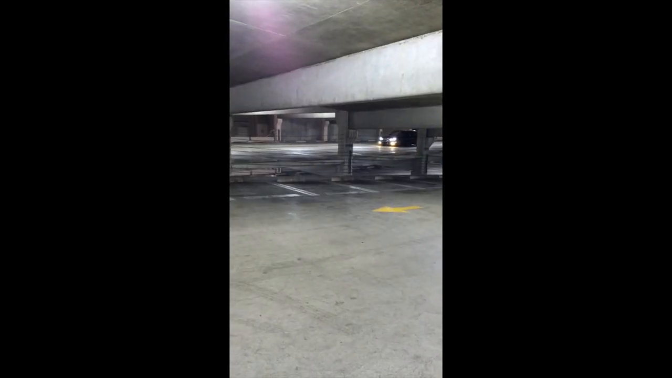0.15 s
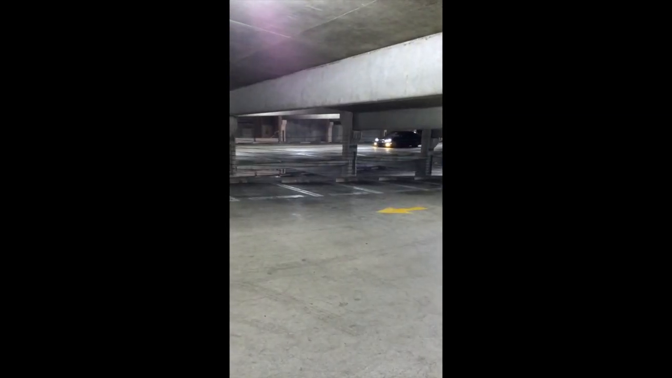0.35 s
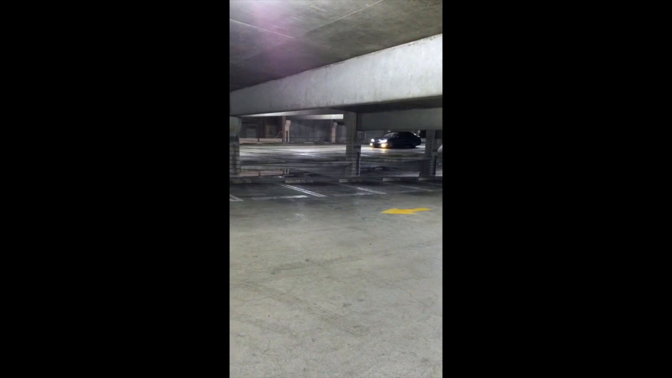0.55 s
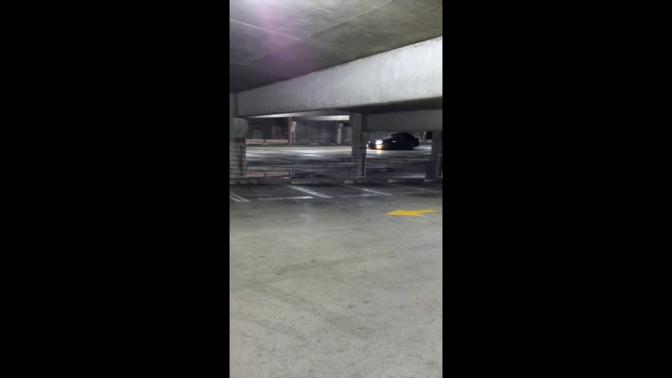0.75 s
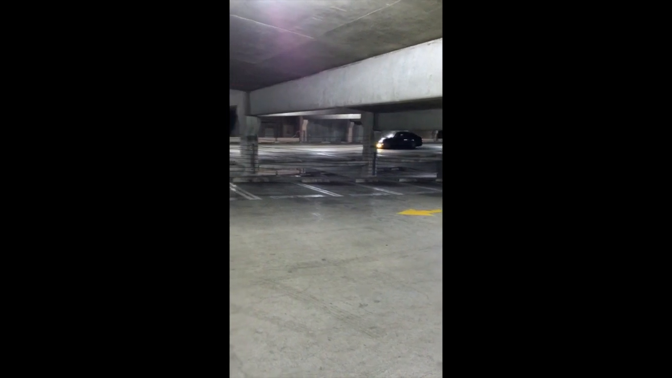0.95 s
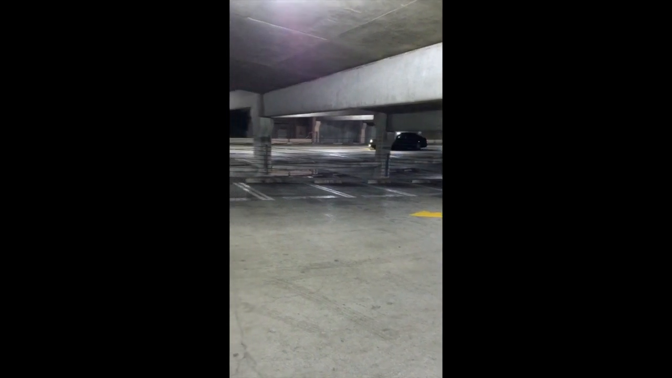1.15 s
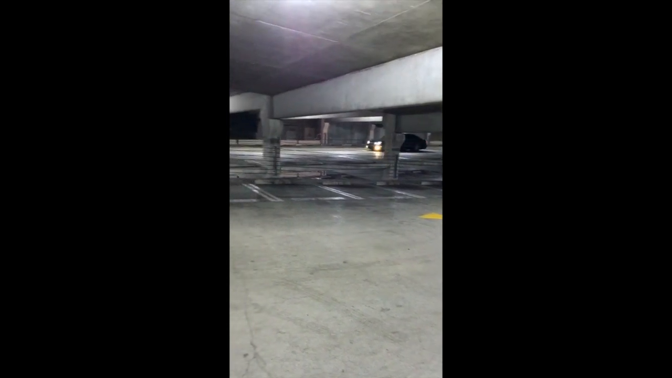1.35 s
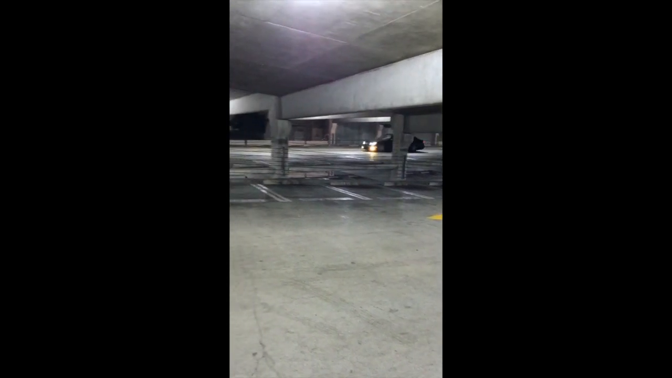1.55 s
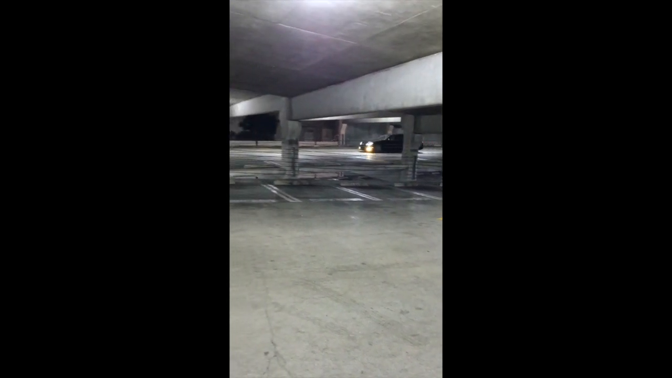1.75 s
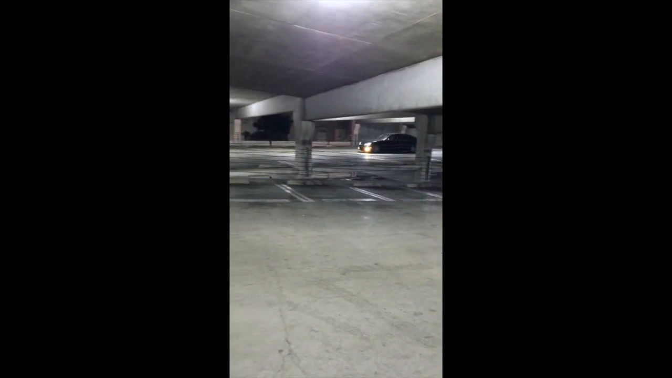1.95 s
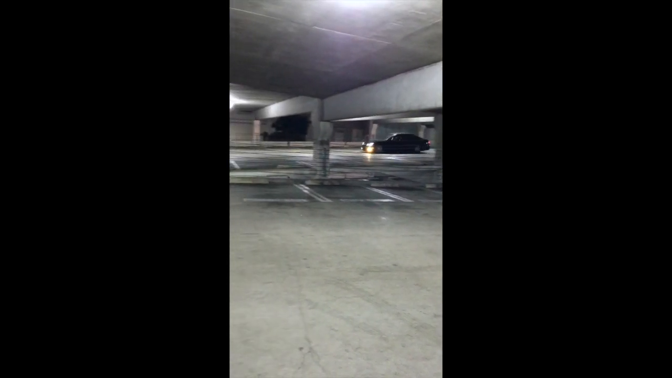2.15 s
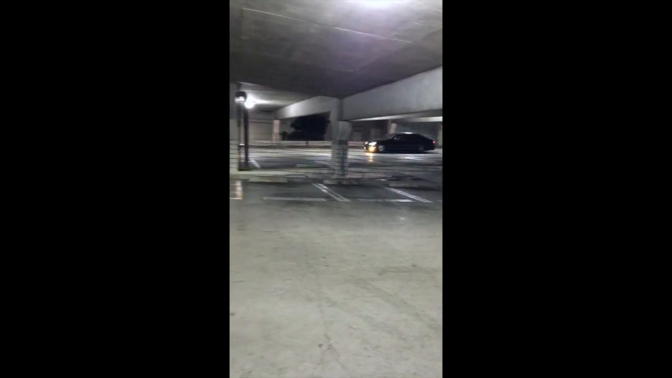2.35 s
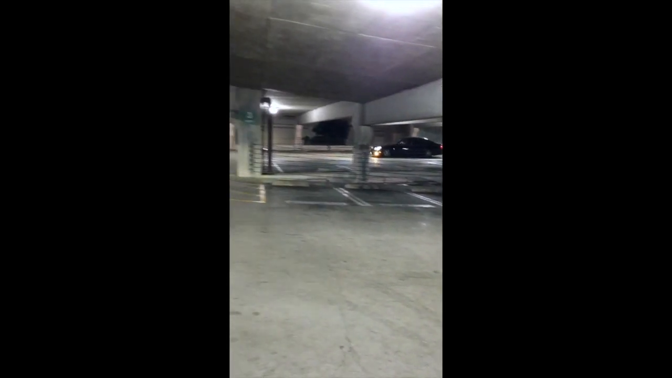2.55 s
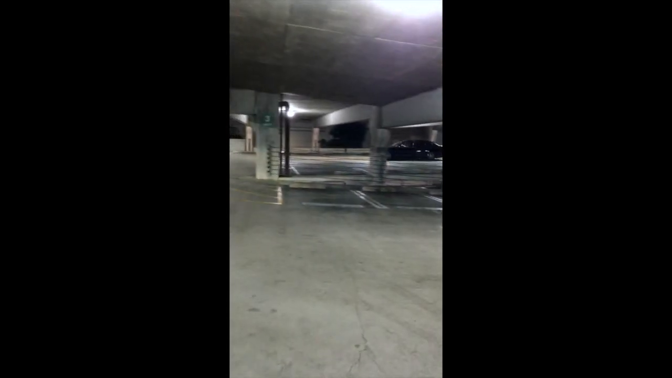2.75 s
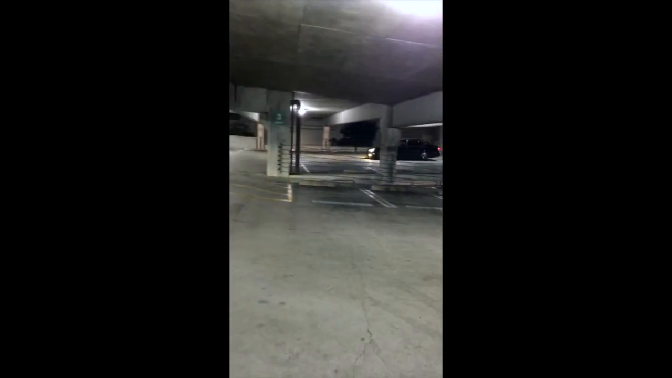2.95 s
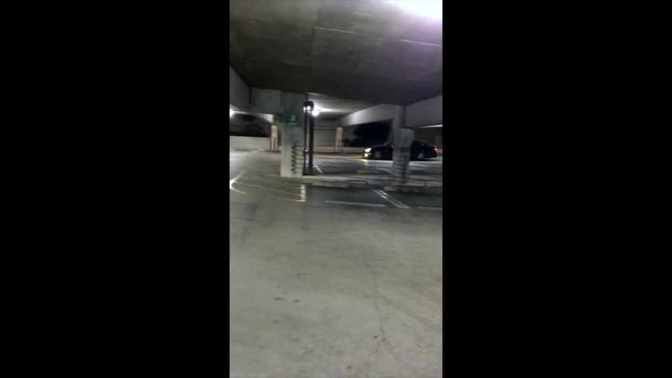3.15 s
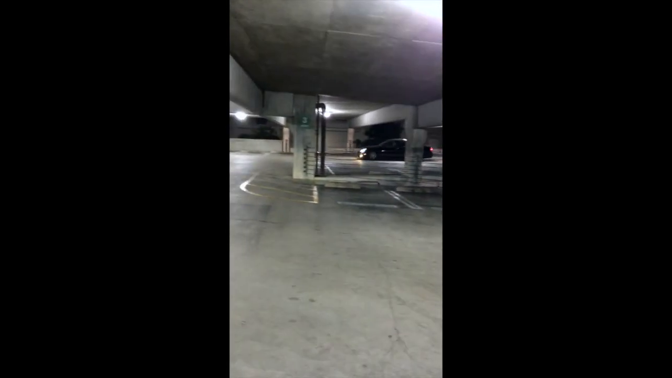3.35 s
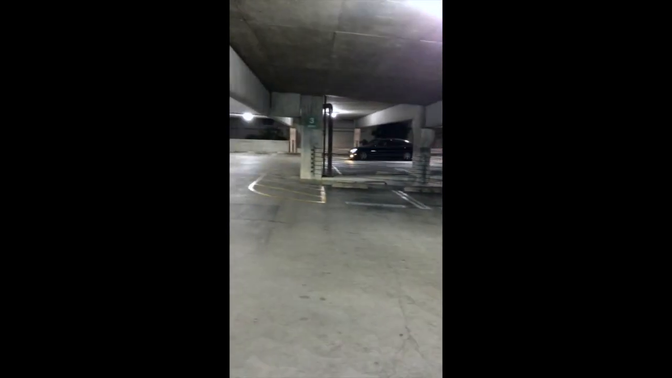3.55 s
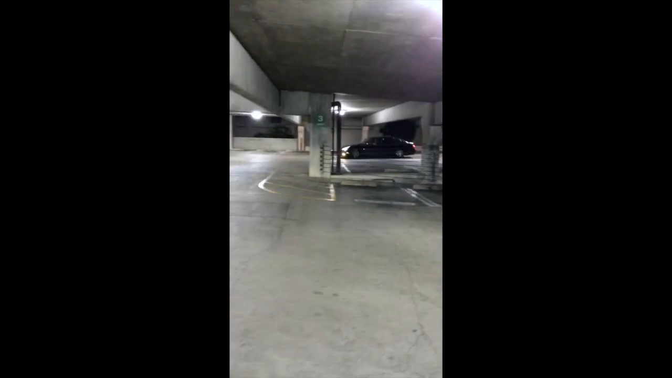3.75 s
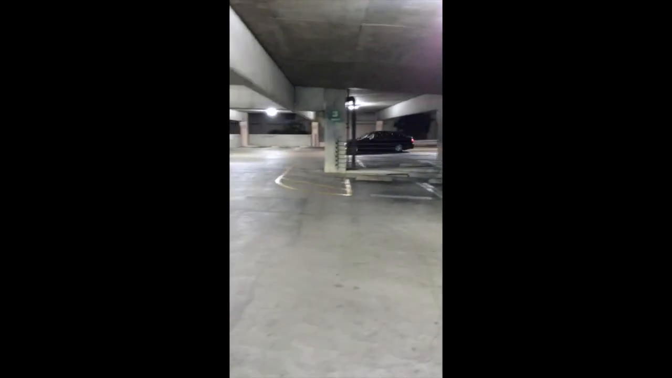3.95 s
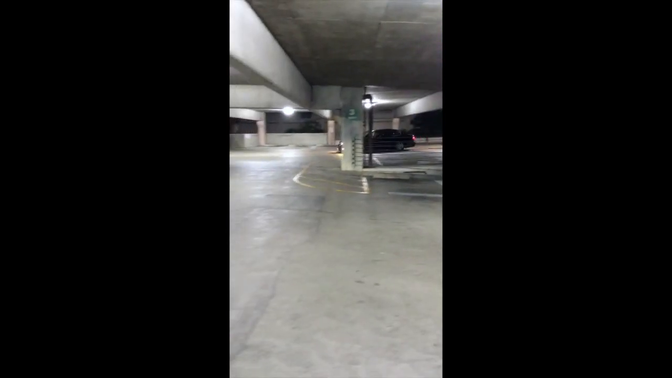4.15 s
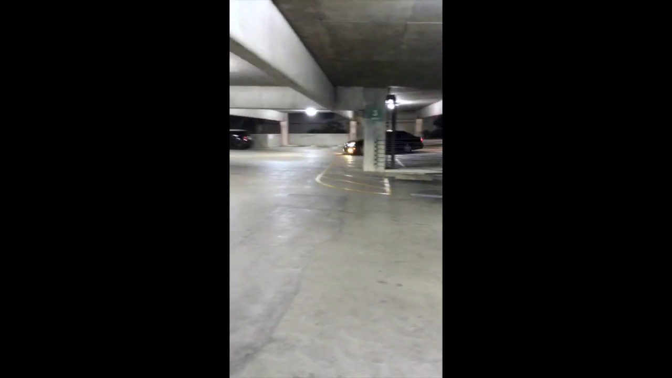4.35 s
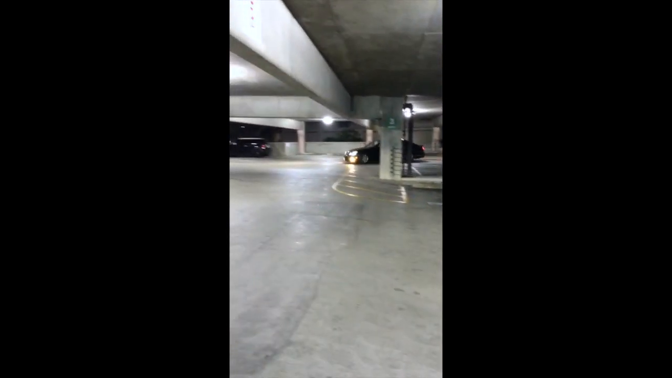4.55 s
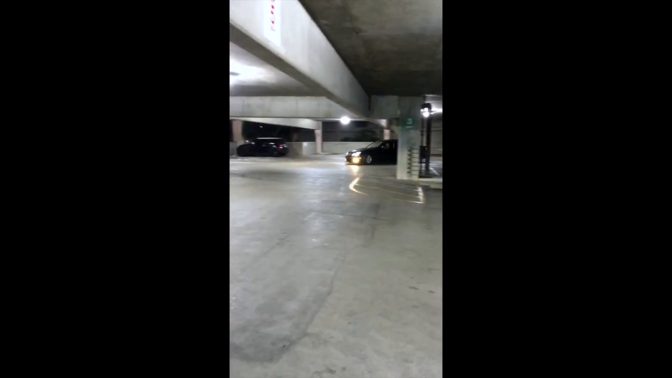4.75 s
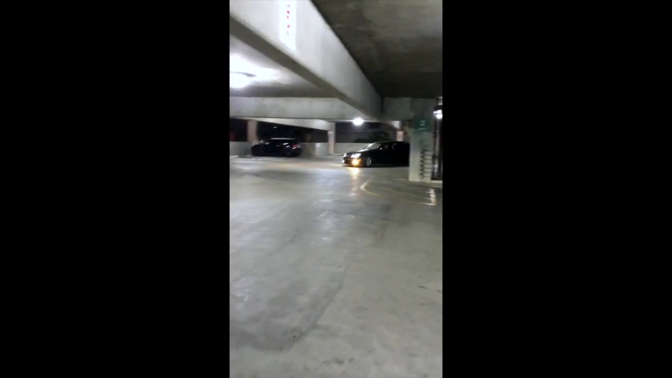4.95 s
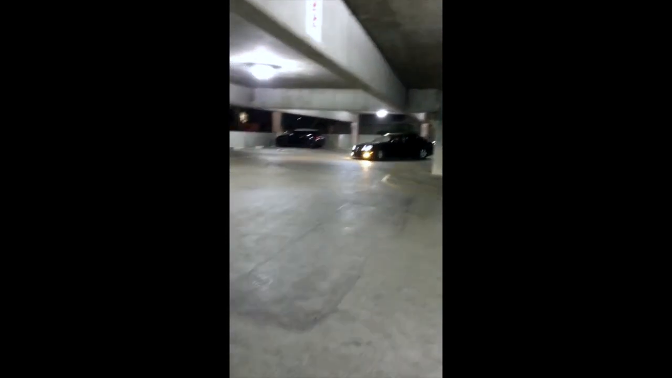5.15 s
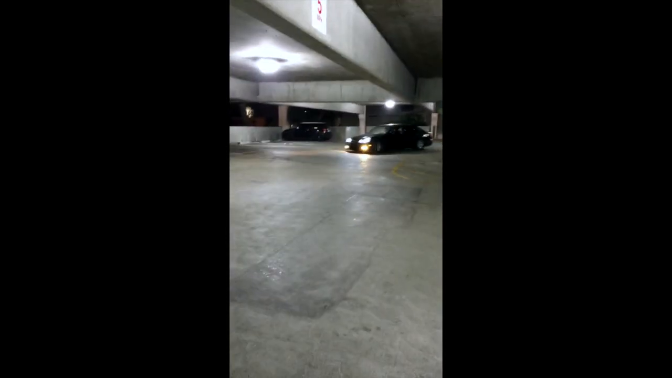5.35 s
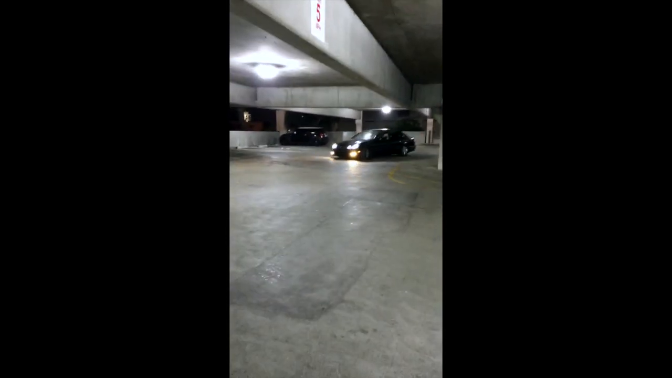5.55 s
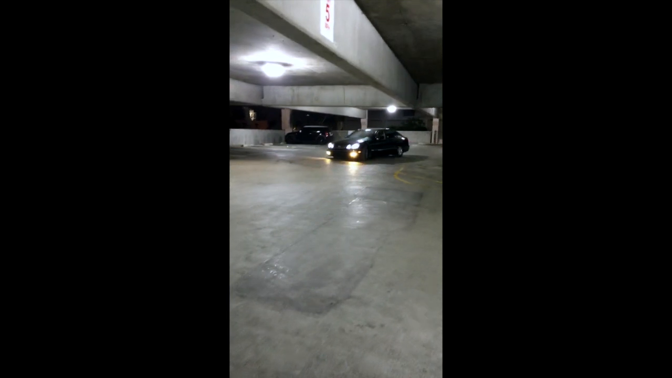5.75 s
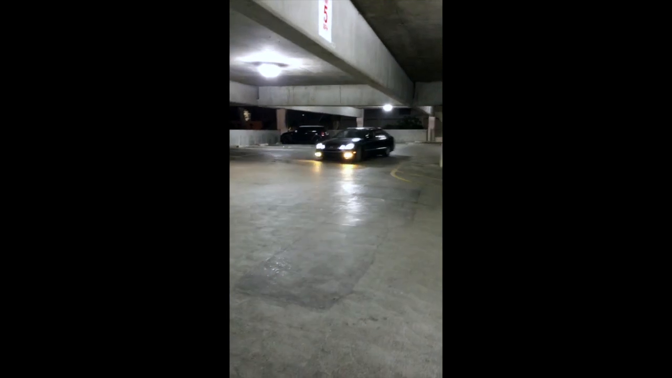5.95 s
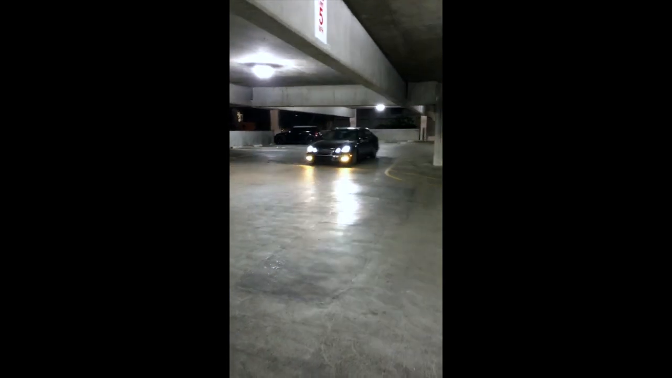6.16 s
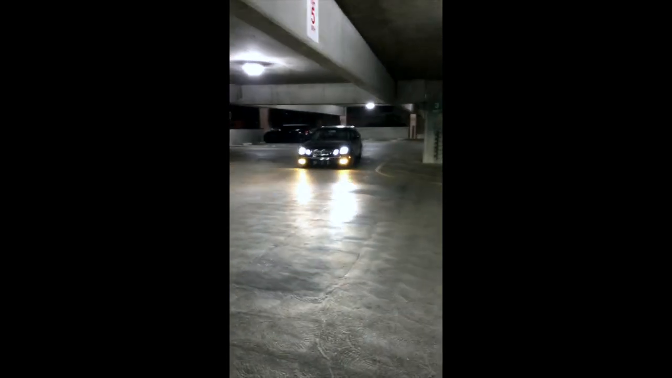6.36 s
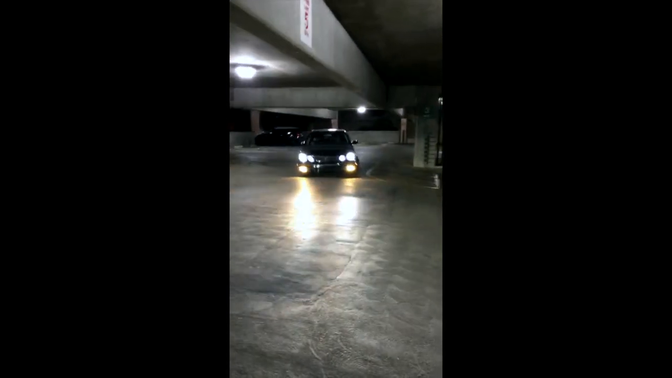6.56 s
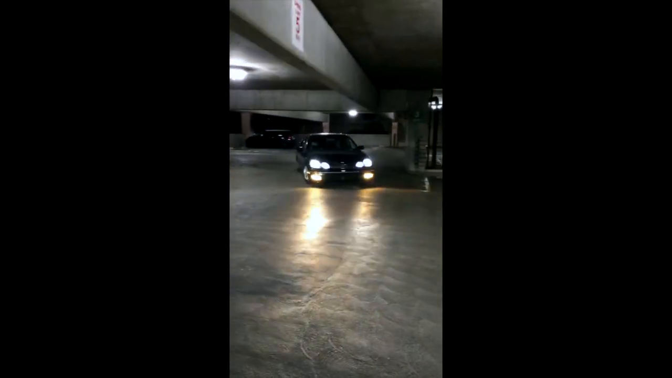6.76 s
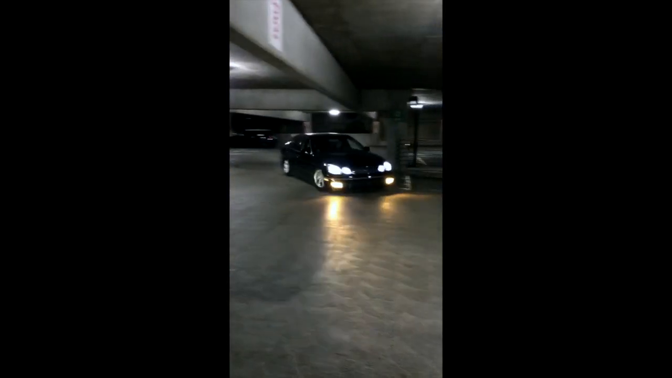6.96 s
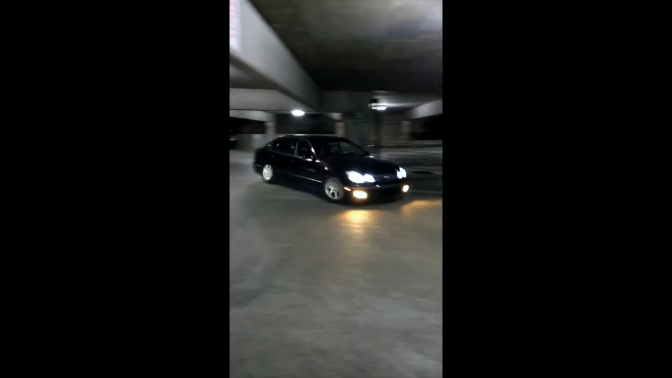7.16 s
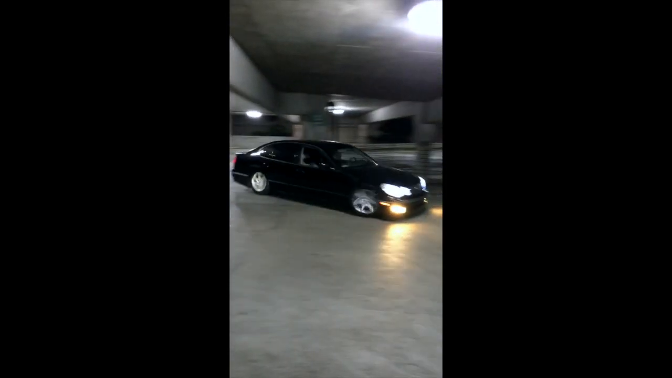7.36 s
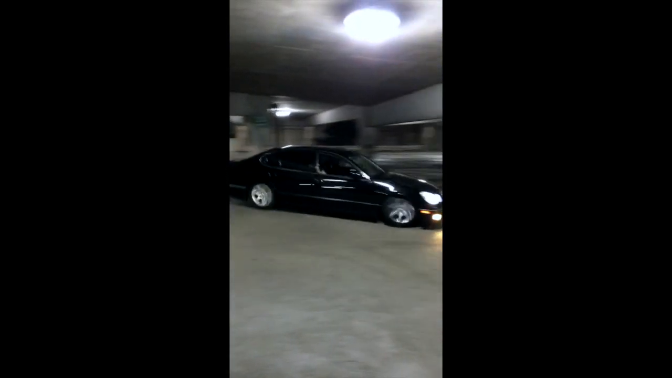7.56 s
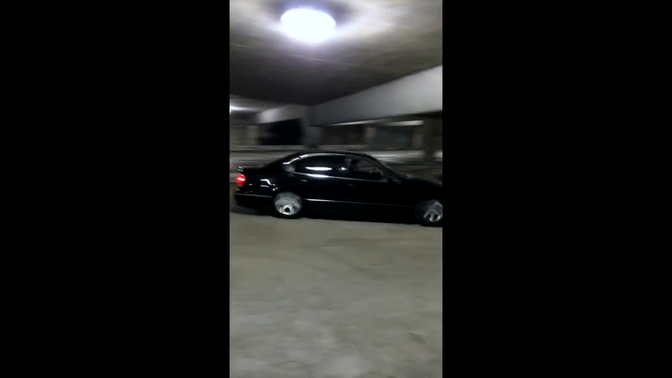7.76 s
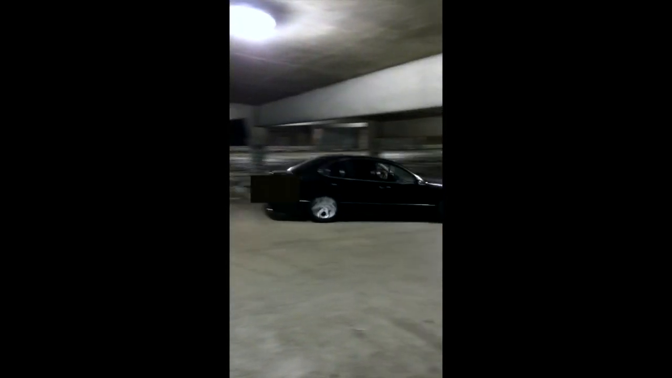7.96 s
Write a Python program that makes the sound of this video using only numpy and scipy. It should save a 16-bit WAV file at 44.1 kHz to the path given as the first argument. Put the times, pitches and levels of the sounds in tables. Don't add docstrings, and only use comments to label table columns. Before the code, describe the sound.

A handheld microphone in a reverberant parking deck catches a car's hollow exhaust note, then throttle-off burbles and irregular pops dying into a weak, low idle. Steady hiss and a few gritty shoe scrapes come forward in the lull. Near the end the engine suddenly picks up, pops thickly, climbs in pitch and blares past nearby, harsh and boomy, still loud at the cut.

```python
import sys
import numpy as np
from scipy import signal
from scipy.fft import rfft, irfft, next_fast_len
from scipy.io import wavfile
from scipy.ndimage import uniform_filter1d

SR = 44100
rng = np.random.default_rng(int(sys.argv[2]) if len(sys.argv) > 2 else 0)


def store_pcm(level_fs):
    pcm = np.round(np.clip(level_fs, -1, 1) * 32767).astype(np.int16)
    wavfile.write(sys.argv[1], SR, np.atleast_2d(pcm).T)


def undo_db(level):
    steps = np.asarray(level, float) / 20
    return 10 ** steps


N = 353348
T = np.arange(N) / SR

# start_s, firing_rate_hz, echoed_boom_db, hidden by pillars (0-1), pipe facing us (0-1)
ENGINE = [(0, 80.05, -29.5, 0.19, 0.26), (.85, 76.8, -27.5, 0.4, 0), (1.0, 76.95, -31.5, 0.67, 0.1),
          (1.58, 76.68, -34, 0, 0.31), (1.65, 57.4, -30, 0.7, 0.28), (2.07, 66.47, -30, 0.92, 0.08),
          (2.55, 62.2, -34, 0.78, 0.19), (3.4, 54.06, -40, 0.91, 0.17), (4.6, 50.75, -46.5, 0.78, .0),
          (5.62, 50.24, -39.5, 1, 0), (5.72, 51.87, -31.5, 0.9, 0.37), (5.9, 68, -27.5, 0.5, 0.52),
          (6.01, 78.37, -25.5, 0.07, 0.49), (6.93, 86.58, -25.5, 0, 0.52), (7.1, 93.02, -23.5, 0.1, 0.71),
          (7.24, 104.4, -24, 0.06, 0.9), (7.55, 102.5, -24.5, 0.07, 0.95), (8.01, 97.07, -20.5, 0.1, 0.56)]


def in_time(rows):
    s, *columns = np.transpose(rows)
    return [np.interp(T, s, c) for c in columns]


def at_hz(points, hz):
    points = np.array(points)
    return np.interp(np.log(hz + 1), np.log(points[:, 0]), points[:, 1])


def colour(x, spectrum):
    size = next_fast_len(len(x))
    gain = undo_db(at_hz(spectrum, np.fft.rfftfreq(size, 1 / SR)))
    return irfft(rfft(x, size) * gain, size)[:len(x)]


def band(x, low_hz, high_hz, order=4):
    return signal.sosfilt(signal.butter(order, [low_hz, high_hz], "band", fs=SR, output="sos"), x)


def evened(x, span_s):
    size = int(span_s * SR)
    power = uniform_filter1d(uniform_filter1d(x ** 2, size), size)
    return x / np.sqrt(power + 1e-20)


def drift(per_s):
    knots = rng.standard_normal(int(N / SR * 40) + 3)
    return np.interp(T * per_s, np.arange(len(knots)), knots)


def blend(a, b, share):
    return a + (b - a) * np.clip(share, 0, 1)


def crest(s, length):
    out = np.zeros(N)
    near = slice(max(int((s - length) * SR), 0), int((s + length) * SR))
    out[near] = np.cos(np.pi * np.clip((T[near] - s) / length, -.5, .5)) ** 2
    return out


def crests_db(rows):
    return sum(db * crest(s, length) for s, db, length in rows)


def gain_ride():
    start_duck_db, recover_db_per_s = 12, 2.5
    duck_above_db, duck_share = -29, 0.68
    duck = duck_share * np.maximum(in_time(ENGINE)[1] - duck_above_db, 0)
    return -np.maximum(start_duck_db - recover_db_per_s * T, uniform_filter1d(duck, SR // 2))


def air():
    # pitch_hz, level_db (per Hz)
    roar_spectrum = [(50, -36), (80, -1), (150, 2), (300, 1.5), (650, -5.5), (950, 0.5), (1200, -5),
                     (1650, -4.5), (2450, -15.5), (3300, -12.5), (3650, -20), (5300, -21.5), (5900, -27),
                     (7800, -28.5)]
    # pitch_hz, level_db (per Hz)
    hiss_spectrum = [(3000, -17), (7000, 1), (10500, 0), (12000, 0), (13000, -0.5), (13900, -7),
                     (15000, -15)]
    vents_db, tyres_facing_db, gain_share, hiss_db = -41.5, 6, 0.41, -62
    ticks_per_s, tick_at_s, tick_weak, tick_db, tick_sharp = 40.3, 5.0, .5, 3.0, 4.0
    roar = colour(rng.standard_normal(N), roar_spectrum + [(8600, -36.5), (15000, -39.0)])
    hiss = colour(rng.standard_normal(N), hiss_spectrum)
    turn = np.pi * ticks_per_s * (T - tick_at_s)
    ticks = abs(np.cos(turn)) ** tick_sharp * blend(tick_weak, 1, np.cos(turn) + 1)
    hiss += undo_db(tick_db) * ticks * band(hiss, 12200, 13400, order=2)
    roar_db = vents_db + tyres_facing_db * in_time(ENGINE)[3] + gain_share * gain_ride()
    roar *= undo_db(roar_db) / np.std(band(roar, 560, 3400))
    for edges_hz in ((100, 500), (500, 1300), (1300, 2600), (2600, 6000)):
        register = signal.butter(1, edges_hz, "band", fs=SR, output="sos")
        roar += (undo_db(.8 * drift(11)) - 1) * signal.sosfiltfilt(register, roar)
    return roar + hiss / np.std(hiss) * undo_db(hiss_db + gain_ride() + 1.2 * drift(13.0))


def scuffs():
    # start_s, rise_s, length_s, level_db
    strokes = [
        (3.765, .01, .06, -50.5),
        (3.835, .015, .045, -48.5),
        (3.89, .02, .07, -55.0),
        (3.9, .05, .2, -61.0),
        (3.1, .15, .3, -61.0),
        (5.4, .42, .6, -53.0),
        (6.8, .25, .39, -52.5),
        (7.0, .12, .19, -55.0),
    ]
    # pitch_hz, level_db (per Hz)
    grit_spectrum = [(1500, -20), (3000, 0), (5200, -2), (7500, -6), (9000, -10), (12500, -12),
                     (13500, -15), (15000, -19)]
    grains = (rng.random(N) < 600 / SR) * np.minimum(rng.exponential(1.5, N), 4)
    grit = colour(rng.standard_normal(N) * (1 + grains), grit_spectrum)
    pressure = np.zeros(N)
    for s, rise, length, db in strokes:
        bite = np.clip((T - s) / rise, 0, 1)
        let_go = np.clip((s + length - T) / .05 + 1, 0, 1)
        pressure += undo_db(db) * bite * let_go
    return grit / np.std(grit) * pressure * undo_db(1.4 * drift(30))


def deck(x):
    # pitch_hz, width_hz, lift_db
    standing_waves = [(155, 14, 10.0), (227, 16, 10.0), (300, 18, 10.0), (373, 14, 5.0), (446, 20, 6.0),
                      (670, 40, 5.0), (120, 12, 5.0), (200, 16, 7.0)]
    # pitch_hz, decay_s
    decay = [(60, 3.7), (300, 1.43), (1000, 2.9), (4000, 2.25)]
    t, tail = T[:3 * SR], 0
    for hz in 62.5 * 2. ** np.arange(7):
        dying = undo_db(-60 * t / at_hz(decay, hz))
        tail = tail + band(rng.standard_normal(len(t)), hz / 2 ** .5, hz * 2 ** .5, order=2) * dying
    run_in = np.concatenate([x[SR:0:-1], x])
    wet = signal.fftconvolve(run_in, tail)[SR:SR + N]
    out = wet.copy()
    for hz, width_hz, lift_db in standing_waves:
        r = np.exp(-np.pi * width_hz / SR)
        top = [(1 - r * r) / 2, 0, (r * r - 1) / 2]
        bottom = [1, -2 * r * np.cos(2 * np.pi * hz / SR), r * r]
        out += (undo_db(lift_db) - 1) * signal.lfilter(top, bottom, wet)
    return out


def pops():
    # start_s, peak_db, pitch_hz
    late_firings = [(1.422, -17, 221), (1.603, -15.5, 168), (1.669, -19, 190), (1.698, -17.5, 193),
                    (1.752, -17, 195.3), (1.782, -14, 164.6), (1.85, -12.5, 201.5), (1.894, -13, 212),
                    (1.939, -15.5, 173.4), (2.015, -14, 206.5), (2.061, -11, 207), (2.089, -13, 195.5),
                    (2.129, -17.5, 206), (2.189, -15.5, 213), (2.229, -17.5, 183), (2.297, -16, 207),
                    (2.349, -29, 185.7), (2.418, -20, 195), (2.47, -28, 190), (2.519, -16.5, 194.4),
                    (2.549, -25, 199.3), (2.649, -24.5, 202), (2.699, -21, 192), (2.774, -22, 178),
                    (2.88, -21, 199), (3, -26, 204.8), (3.079, -24, 196), (3.15, -23, 210.7),
                    (3.201, -25, 164), (3.259, -24, 218.8), (3.471, -30, 140), (3.501, -29, 142),
                    (3.667, -26.5, 154), (3.743, -30, 170), (5.528, -21, 167.3), (5.573, -23, 202),
                    (5.619, -26, 201.7), (5.659, -21, 186), (5.683, -15.5, 150.9), (5.727, -12.5, 160),
                    (5.769, -14.5, 230), (5.809, -11, 202.1), (5.84, -17, 213), (5.87, -12.5, 190.8),
                    (5.899, -8.5, 219), (5.949, -12, 290), (5.989, -9, 298.1), (3.81, -28, 225.2),
                    (3.95, -28, 213), (4.11, -31, 160.4), (4.272, -34, 207), (4.355, -29, 234.6),
                    (4.44, -32, 159.8), (4.59, -29, 190), (4.747, -30, 213.7), (4.82, -32, 259),
                    (5.059, -26, 210), (5.125, -29.5, 230), (5.2, -29, 198), (5.276, -28, 169)]
    # pitch_hz, level_db
    deck_answers = [(295.6, -12.5), (378.6, -14.5), (140, -11)]
    decay_s, rise_s, trim_db = 0.16, 0.0053, -1
    dulling = 0.63
    out, t = np.zeros(N), T[:SR // 4]
    shape = (1 - np.exp(-t / rise_s)) * undo_db(-60 * t / decay_s)
    for (s, db, hz), chance in zip(late_firings, rng.standard_normal((len(late_firings), 3))):
        ring = np.sin(2 * np.pi * hz * t)
        for (answer_hz, answer_db), c in zip(deck_answers, chance):
            level = undo_db(answer_db + dulling * (db + 10.5) + 3.2 * c)
            ring = ring + level * np.sin(2 * np.pi * answer_hz * (1 + 0.025 * c) * t + 3 * c)
        start = int(s * SR)
        out[start:start + len(t)] += undo_db(db + trim_db) * shape * ring
    return out


def firings(rate_hz):
    cylinder_db = [-1.7, 0.33, 1, 0.36, -1.8, 0.94]
    hidden, facing = in_time(ENGINE)[2:]
    rough = blend(.3, .55, hidden)
    bank_db = 1.2 + 1.4 * hidden + .7 * facing
    turns = np.cumsum(rate_hz) / SR
    at = np.searchsorted(turns, np.arange(1, int(turns[-1])))
    chance = rng.standard_normal((len(at), 2))
    k = np.arange(len(at))
    size_db = np.array(cylinder_db)[k % 6] + bank_db[at] * (-1) ** k + 10.0 * rough[at] * chance[:, 0]
    late = (chance[:, 1] * rough[at] * 0.00071 * SR).astype(int)
    puffs = np.zeros(N)
    puffs[np.clip(at + late, 0, N - 1)] = undo_db(size_db)
    fade = np.exp(-1 / (0.0066 * SR))
    gust = signal.lfilter([1], [1, -fade], puffs) * rng.standard_normal(N)
    return puffs + undo_db(-18.5) * np.sqrt(rough) * gust


def orders(rate_hz, levels, minor_db):
    # multiple of firing rate, level_db (re minor level)
    minor = [(1.5, -26.0), (2.5, -11.0), (3.5, -9.0), (4.5, -12.0), (5, -20.0), (6, -22.0), (6.5, -21.0)]
    phase = 2 * np.pi * np.cumsum(rate_hz) / SR
    scatter = np.clip(in_time(ENGINE)[2], 0, 1) ** 3

    def paths(k):
        return drift(13.0) * np.sin(k * phase) + drift(13.0) * np.cos(k * phase)

    out = np.zeros(N)
    for k, level in enumerate(levels, 1):
        straight = np.sin(k * phase + k * k + .45 * drift(9.0))
        out += level * (np.sqrt(1 - scatter) * straight + np.sqrt(scatter) * paths(k))
    for k, db in minor:
        out += undo_db(minor_db + db) * paths(k)
    return out * 2 ** .5


def ladder(rate_hz):
    # centre_s, multiple of firing rate, level_db, length_s
    brief_tones = [(6.376, 3.5, -31.5, 0.29), (6.452, 3.5, -31, 0.25), (6.91, 3.5, -25, 0.11),
                   (7.017, 5, -28, 0.25), (7.15, 3.5, -26, 0.22), (7.21, 4.5, -41, 0.35),
                   (7.258, 3.5, -25, 0.18), (7.363, 3.5, -31, 0.16), (7.376, 1.5, -26.5, 0.27),
                   (7.387, 6.5, -28, 0.17), (7.426, 2.5, -20.5, 0.4), (7.5, 4.5, -35, .16),
                   (7.509, 6.5, -30, 0.16), (7.53, 3.5, -24, .3), (7.537, 7.5, -24, 0.12),
                   (7.6, 6, -39, 0.17), (7.633, 5, -25.5, 0.11), (7.649, 1.5, -29, 0.22),
                   (7.701, 2.5, -33, .36), (7.705, 4.5, -24, .18), (7.715, 3.5, -22.5, 0.23),
                   (7.81, 4.5, -24.5, 0.18), (7.851, 3.5, -26.5, 0.34), (7.96, 2.5, -29, 0.12),
                   (7.32, 4, -30, .16), (7.46, 4, -29, 0.16), (7.58, 4, -26, .24), (7.68, 4, -28, .16),
                   (7.834, 4, -27, .26), (7.945, 4, -33, 0.11), (7.35, 8.5, -36, .2),
                   (7.454, 9.5, -24, 0.27), (7.5, 8.5, -35, .2), (7.331, 7.5, -42, 0.26),
                   (7.626, 7, -36, .2), (7.307, 11.5, -28, .2), (5.93, 9.5, -34, .25), (6.0, 8, -37, .15),
                   (6.12, 8.5, -40, .08), (6.27, 8, -37, .15), (6.45, 4, -31, .25), (6.2, 5.5, -30, .15),
                   (.15, 6, -38, .2), (2.03, 5.5, -28, .12), (2.13, 5.5, -31, .16),
                   (1.89, 4.5, -27.5, .15), (7.4, 10.5, -33, .2), (7.55, 11.5, -30, .2),
                   (7.622, 12.5, -32.5, .15), (7.45, 12, -27, 0.18),
                   (5.745, 5.5, -26, 0.067), (5.76, 7, -34, 0.13), (5.81, 6.5, -28.5, 0.12),
                  (6.4, 5, -27, 0.12), (5.87, 4.5, -29.5, 0.079), (5.93, 5, -28, .12), (5.97, 4, -26, .1),
                  (6.04, 6, -27.5, 0.13), (5.88, 10, -38, 0.13), (5.94, 11.5, -38, .1),
                  (6.22, 5.5, -32.5, 0.09), (6.36, 3.5, -26, 0.07), (7.6, 8, -33, 0.12),
                  (6.58, 8, -31, 0.091), (6.3, 5.5, -34, .08), (6.95, 6, -30.5, .1),
                  (7.08, 5.5, -29, 0.073), (7.55, 10.5, -22, 0.14), (7.79, 10.5, -24.5, 0.11),
                  (7.31, 10.5, -30, .1), (7.3, 12.5, -28, .12), (7.68, 12.5, -29, 0.095),
                  (7.65, 10.5, -29, .1), (7.73, 8.5, -29, .1), (.11, 3, -30, .14), (0.664, 2, -32, 0.092),
                  (0.856, 2, -25.5, 0.093), (1.1, 2, -30, 0.082), (1.15, 3, -33, 0.11),
                  (0.98, 4, -37, 0.11), (1.22, 4, -33, 0.09), (1.9, 4.5, -34, 0.15),
                  (2.25, 4.5, -28.5, 0.14), (1.4, 2, -30, 0.076), (7.82, 5, -30, .12), (7.88, 6, -31, .1),
                  (6.34, 6.5, -33, .12), (.36, 4, -30, .1), (.97, 3, -30, .08), (6.26, 2, -25, .08),
                  (7.42, 9, -29, .1), (7.37, 8.5, -30, .1)]
    phase, out = 2 * np.pi * np.cumsum(rate_hz) / SR, np.zeros(N)
    for s, k, db, length in brief_tones:
        near = slice(int((s - length) * SR), int((s + length) * SR))
        swell = np.cos(np.pi * np.clip((T[near] - s) / length, -.5, .5)) ** 2
        out[near] += undo_db(db) * swell * np.sin(round(2 * k) / 2 * phase[near] + k * k)
    return out


def exhaust():
    # pitch_hz, level_db (per Hz)
    pipe_spectrum = [(50, -32.5), (90, -32.5), (140, 1.5), (300, 4.5), (450, -4), (560, -11.5), (1000, -12),
                     (1220, -15), (1600, -24.5), (1900, -25), (2400, -35.5), (3300, -37.5), (5000, -51),
                     (8000, -75)]
    edges_hz = [75, 530, 9000]
    # away_db, facing_db (re boom)
    orders_db = [(-28.5, -7), (-12.5, -1.5), (-4, -7.5), (-9, -7), (-20.5, -10.5), (-19, -15.5)]
    # centre_s, multiple of firing rate, level_db, length_s
    swells = [(0.027, 2, -21, 0.097), (0.252, 2, -19.5, 0.33), (0.44, 2, -22, 0.19),
              (0.616, 2, -24.5, 0.12), (0.793, 2, -22, 0.15), (1.508, 2, -26, 0.23), (6.056, 2, -18, 0.15),
              (6.271, 2, -28, 0.2), (6.45, 2, -26, 0.2), (6.62, 2, -19.5, 0.35), (6.837, 2, -21, 0.23),
              (6.88, 6, -37, 0.46), (7.224, 2, -20.5, 0.12), (7.364, 2, -25, 0.29), (7.616, 2, -24.5, 0.2),
              (7.24, 1, -30.5, 0.28), (7.793, 1, -27, 0.32), (0.11, 3, -31, 0.23), (0.61, 3, -27, 0.14),
              (1.14, 3, -37, 0.35), (0.421, 3, -29, 0.215), (0.97, 3, -32.5, 0.12), (1.345, 3, -28, 0.082),
              (1.453, 3, -40, 0.13), (1.033, 2, -37, 0.18), (0.405, 4, -34.5, 0.2), (0.92, 4, -42, 0.15),
              (1.285, 4, -31.5, 0.079), (6.37, 3, -28, 0.21), (6.605, 3, -44, 0.18),
              (6.767, 3, -28.5, 0.21), (6.914, 3, -22.5, 0.11), (7.09, 2, -32, 0.17), (7.763, 2, -31, 0.18),
              (7.86, 2, -34, 0.13), (7.975, 2, -33, 0.13), (7.35, 3, -20.5, 0.18), (7.667, 3, -24, 0.1),
              (7.56, 1, -38, 0.18), (7.034, 3, -20.5, 0.23), (7.211, 3, -16, 0.13), (7.49, 3, -18.5, 0.13),
              (7.783, 3, -16, 0.14), (7.94, 3, -17, 0.23), (0.196, 4, -23.5, 0.25), (6.032, 4, -18.5, 0.12),
              (6.54, 4, -31, 0.6)]
    # centre_s, lift_db, length_s
    surges = [(7.09, 4, 0.11), (7.31, 1, 0.1), (7.43, 0.5, 0.083), (7.49, 0, .08), (7.58, 0.5, 0.18),
              (7.23, -3.0, 0.076), (5.86, 2.0, 0.12), (5.99, 2.5, .1), (7.85, -0.5, .3), (7.4, 1.5, .4),
              (5.7, -3.0, .08), (7.16, -2.5, .1), (5, -1, .15)]
    # centre_s, dip_db, length_s
    nulls = [(.075, -4, .05), (.54, -7, .09), (.71, -5, .06), (1.39, -3, .07), (6.13, -3, .1),
             (6.74, -2.5, .08), (7.28, -4, .06), (7.44, -3, .05), (7.56, -3, .06), (7.72, -3, .06)]
    rate_hz, boom_db, hidden, facing = in_time(ENGINE)
    low, mid, high = edges_hz
    pipe = colour(firings(rate_hz), pipe_spectrum)
    echoed = deck(pipe)
    boom = evened(band(echoed, low, mid), .25)
    rasp = .45 * evened(band(pipe, mid, high), .25) + evened(band(echoed, mid, high), .25)

    levels = []
    for away_db, near_db in orders_db:
        fading_db = 9 * abs(drift(11))
        levels.append(undo_db(boom_db + blend(away_db, near_db, facing) - fading_db))
    for s, k, db, length in swells:
        levels[round(k) - 1] += undo_db(db) * crest(s, length)
    levels = [level * undo_db(1.8 * drift(30)) for level in levels]
    minor_db = boom_db + blend(-9, 1.5, hidden) + 8 * facing

    snarl = band(rasp, 1470, 4500, order=2)
    rasp = rasp + undo_db(-10.5) * facing ** 2 * snarl
    rasp_db = boom_db + blend(-23, 5.5, facing) + crests_db(surges)
    echoed_db = boom_db - 1.5 * facing - 3 * hidden
    note = orders(rate_hz, levels, minor_db) + undo_db(echoed_db) * boom
    return note * undo_db(crests_db(nulls)) + ladder(rate_hz) + undo_db(rasp_db) * rasp


def scene():
    return (air() + scuffs() + pops() + exhaust())[None, :]


def low_pass(x):
    return signal.sosfilt(signal.butter(12, 15270, fs=SR, output="sos"), x)


def record(dry):
    thin = signal.sosfilt(signal.butter(3, 70, "high", fs=SR, output="sos"), dry)
    rumble = undo_db(-77.5) * band(rng.standard_normal(N), 15, 60, order=1) * 20
    rounded = .6 * np.tanh((thin + rumble) / .6)
    dull = signal.sosfilt(signal.butter(4, 14200, fs=SR, output="sos"), rounded)
    return low_pass(dull)


dry = scene()
out = record(dry)
store_pcm(out)
```